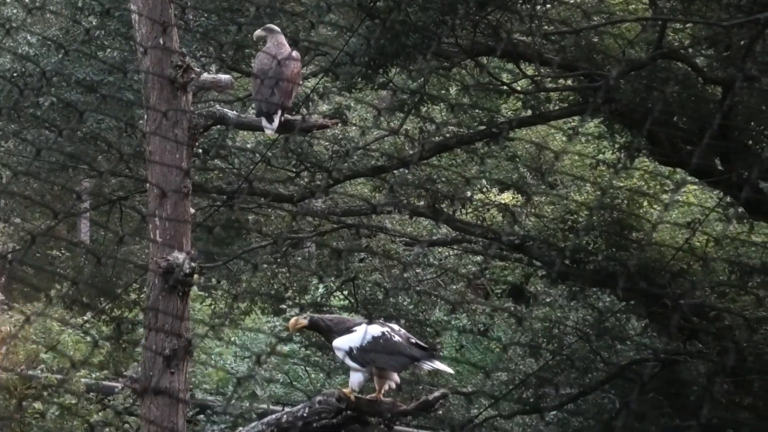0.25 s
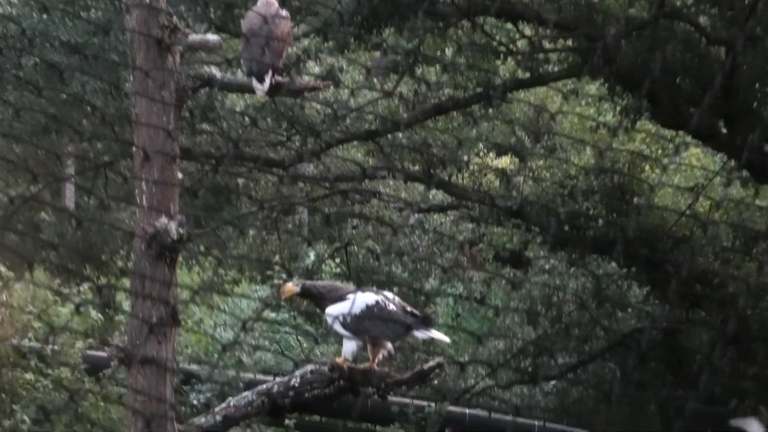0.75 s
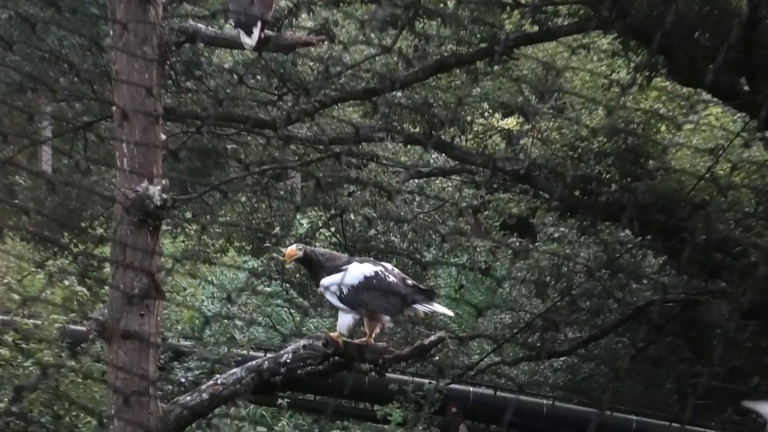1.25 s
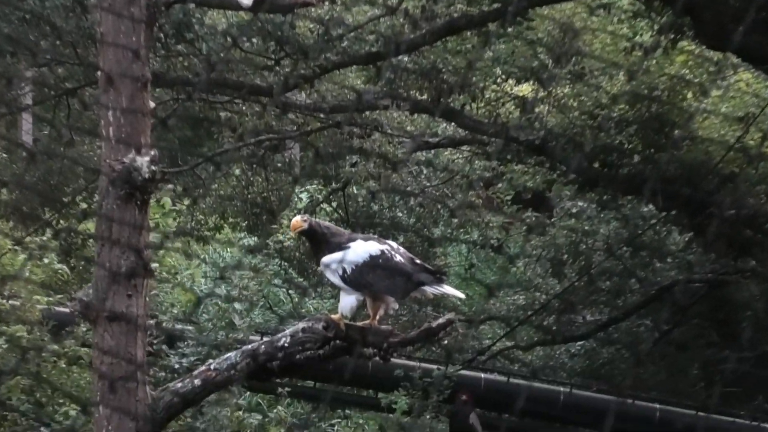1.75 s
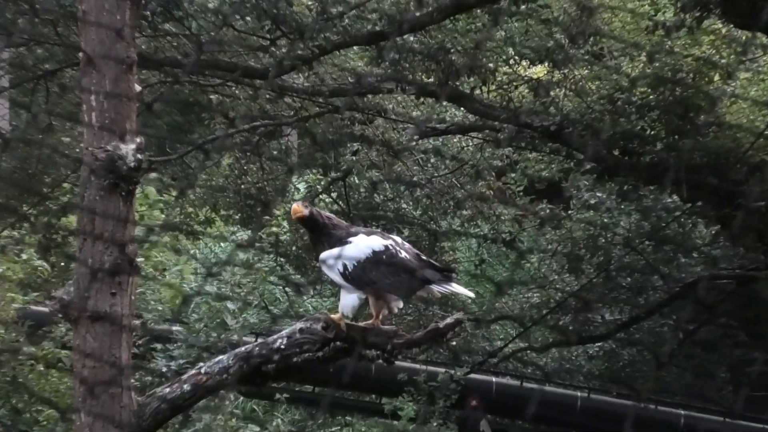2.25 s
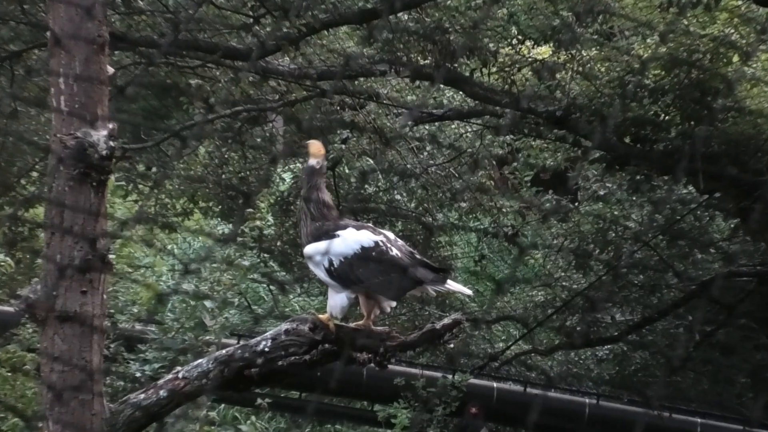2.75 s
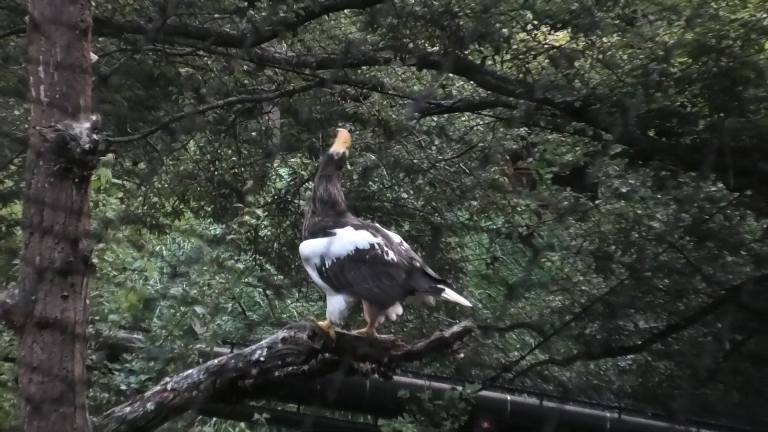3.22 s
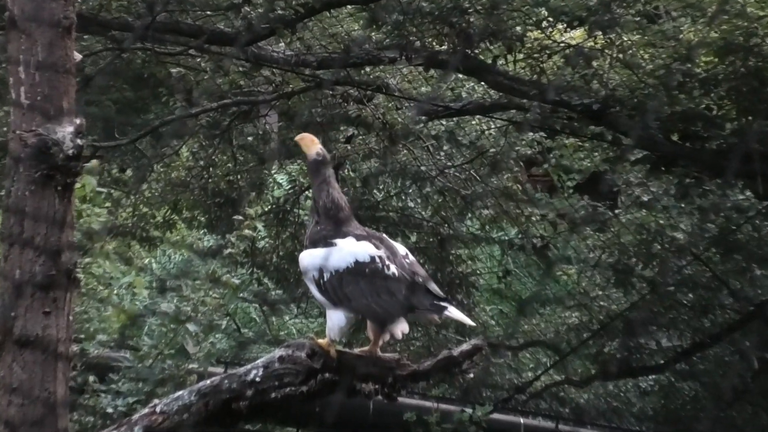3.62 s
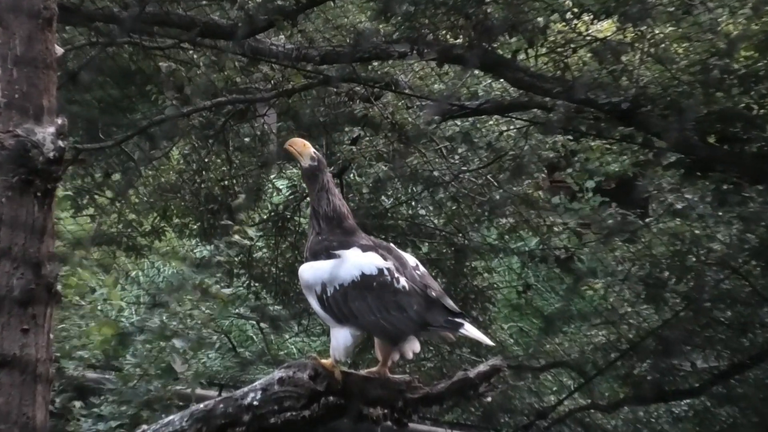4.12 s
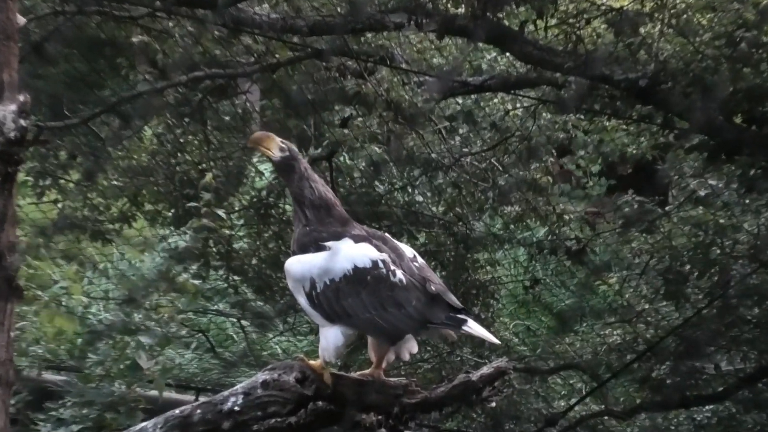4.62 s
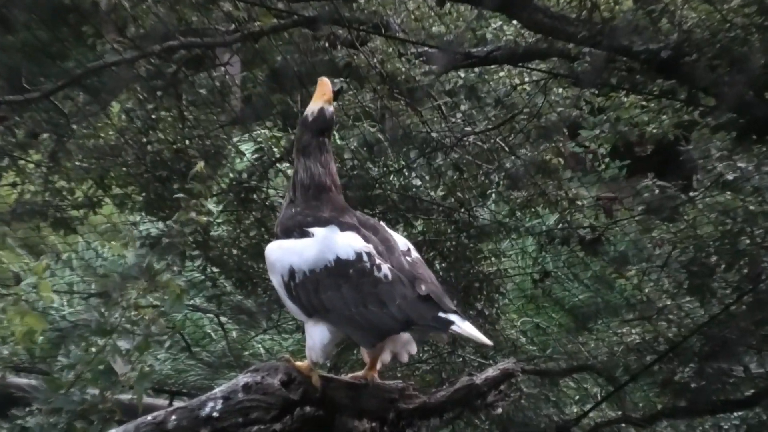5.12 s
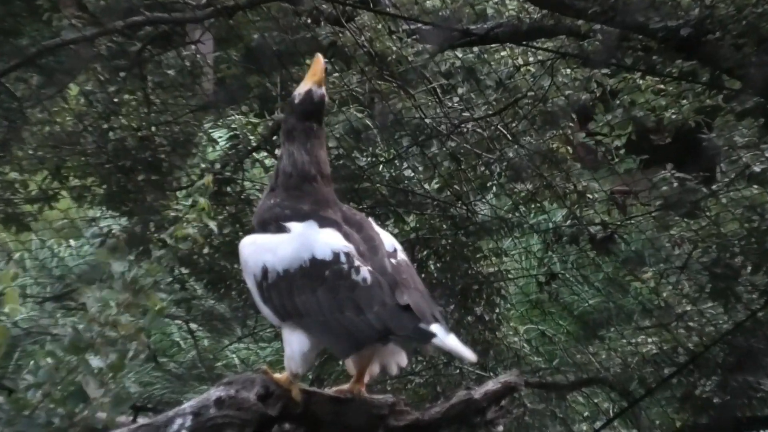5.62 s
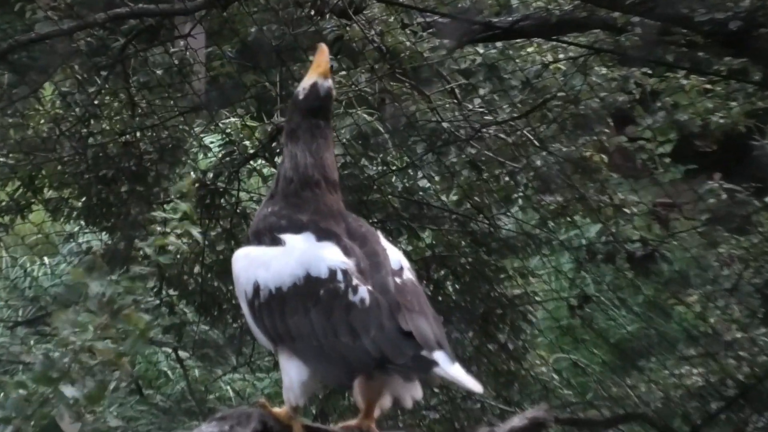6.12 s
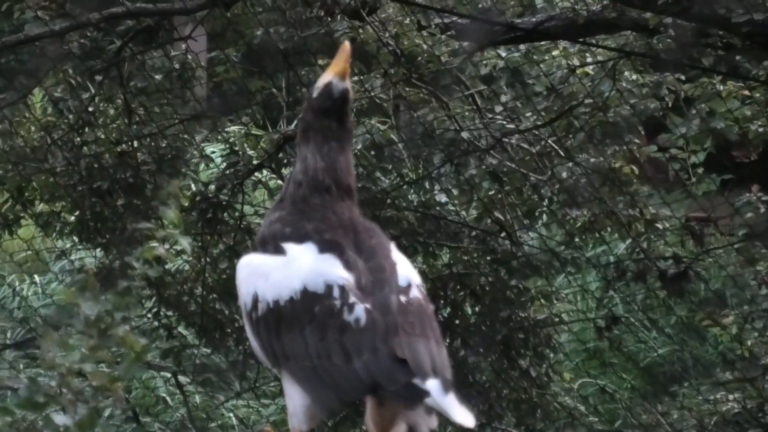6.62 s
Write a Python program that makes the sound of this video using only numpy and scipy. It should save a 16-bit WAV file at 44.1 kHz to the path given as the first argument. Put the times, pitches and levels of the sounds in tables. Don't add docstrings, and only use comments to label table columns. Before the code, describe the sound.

Outdoors among trees, handheld stereo microphone with wind buffeting, strongest around the middle. Cicadas rasp continuously over a hissing distant swarm, and a remote crow caws regularly. A big eagle on a branch first draws faint, thin whistles and mutters small notes, then gives a spaced run of clipped, slightly hoarse yelps, most preceded by a quick rising whistle, with short flickering echoes from trunks and leaves.

```python
import sys
import numpy as np
from scipy import signal
from scipy.fft import rfft, irfft, next_fast_len
from scipy.io import wavfile
from scipy.ndimage import uniform_filter1d, map_coordinates

SR = 44100
rng = np.random.default_rng(int(sys.argv[2]) if len(sys.argv) > 2 else 0)


def put_to_file(sound):
    columns = np.atleast_2d(sound).T
    safe = np.clip(columns, -1, 1)
    whole_steps = np.round(safe * 32767)
    wavfile.write(sys.argv[1], SR, whole_steps.astype(np.int16))


def invert_db(level):
    return 10 ** (np.asarray(level, dtype=float) / 20)


N = 302570
T = np.arange(N) / SR


def unit(x):
    return x / np.sqrt(np.mean(x ** 2) + 1e-20)


def along(points, hz):
    f, v = np.transpose(points)
    return np.interp(np.log(hz + 1), np.log(f + 1), v, left=v[0] - 40, right=v[-1] - 40)


def curves(rows):
    times, *columns = np.transpose(rows)
    return [np.interp(T, times, column) for column in columns]


def wobble(rate):
    return map_coordinates(rng.standard_normal(int(N * rate / SR) + 4), [T * rate])


def phase_of(pitch):
    return 2 * np.pi * np.cumsum(pitch) / SR


def patches(shape, bands, frames):
    field = uniform_filter1d(rng.standard_normal(shape), size=bands, axis=0)
    return unit(uniform_filter1d(field, size=frames, axis=1))


def rush(spectrum, alike, patchy_db):
    size = next_fast_len(N + 8192)
    z = signal.stft(rng.standard_normal((2, N + 512)), nperseg=512)[2]
    gain = invert_db(patchy_db * patches(z.shape[1:], 5, 12))
    pair = signal.istft(z * gain, nperseg=512)[1][:, :N]
    response = invert_db(along(spectrum, np.fft.rfftfreq(size, 1 / SR)))
    a, b = irfft(rfft(pair, size) * response, size)[:, :N]
    turn = np.arccos(np.clip(alike, -1, 1)) / 2
    middle, side = np.cos(turn) * a, np.sin(turn) * b
    return unit(np.array([middle + side, middle - side]))


# (start [s], length [s], top pitch [Hz], share of length at the top [1], level [dB])
YELP_CALLS = [
    (5.1, 0.0934, 955, 0.10146, -28),
    (5.398, 0.074, 970, 0.1888, -25),
    (5.777, 0.084, 1009, 0.2, -25),
    (6.324, .092, 1065, .27, -23),
    (6.751, 0.085, 1064, 0.22, -22.5),
]
# (frequency [Hz], gain [dB])
YELP_THROAT = [(700, -22), (820, -14), (900, -2), (1100, 0), (1500, -4), (1800, -17), (1950, -15),
               (2120, -15.5), (2750, -19), (2900, -16), (3150, -31), (3800, -27), (4250, -35), (5500, -28)]
# (frequency [Hz], density [dB per Hz])
YELP_BREATH = [(550, -18), (750, -2), (1000, 8), (1500, -8), (2100, -12), (3000, -16), (4500, -30)]


def yelps():
    out = np.zeros(N)
    breath = rush(YELP_BREATH, 0.78, patchy_db=4.0)[0]
    for start, length, hz, top, db in YELP_CALLS:
        u = np.clip((T - start) / length, 0, 1)
        arch = .12 + 17 * top ** 3
        pitch = hz * (1 - arch * (u - top) ** 2 - 0.075 * u ** 7)
        phase = phase_of(pitch * (1 + 0.00296 * wobble(150)))
        effort_db = .13 * (hz - 1035) + 5 * (u - .6)
        octave_db = 0.038 * (hz - 977)
        tone = invert_db(-31.5) * np.sin(1.5 * phase)
        for k in range(1, 6):
            partial_db = along(YELP_THROAT, k * pitch) + effort_db * (k > 2) + octave_db * (k == 2)
            tone += invert_db(partial_db) * np.sin(k * phase)
        attack = np.clip(u * length / 0.0052, 0, 1)
        release = np.clip((1 - u) * length / 0.022, 0, 1)
        level_db = db - 5.5 * u ** 0.88 + 0.76 * wobble(90)
        out += invert_db(level_db) * attack * release * (np.sqrt(2) * tone + invert_db(-14.5) * breath)
    return out


def gliding_call(row, rough, bend, swell_db, fade_db, throat=None):
    start, length, first_hz, last_hz, db = row
    u = np.clip((T - start) / length, 0, 1)
    pitch = last_hz + (first_hz - last_hz) * (1 - u) ** bend
    phase = phase_of(pitch * (1 + 0.00777 * rough * wobble(150)))
    top = 0.81 if last_hz > 1.05 * first_hz else 0.37
    swell = swell_db * (1 - u / top) ** 2
    fall = fade_db * (u - top) / (1 - top)
    level_db = db - np.where(u < top, swell, fall)
    tone = np.sin(phase)
    if throat:
        tone = sum(invert_db(along(throat, k * pitch)) * np.sin(k * phase) for k in range(1, 5))
    tone = tone + invert_db(-15 + 5.8 * rough) * wobble(900) * np.sin(phase)
    edges = np.clip(np.minimum(u, 1 - u) * length / 0.011, 0, 1)
    return np.sqrt(2) * tone * edges * invert_db(level_db + 2.4 * rough * wobble(110))


# (start [s], length [s], first pitch [Hz], last pitch [Hz], level [dB])
FAINT_NOTES = [
    (3.107, 0.075, 960, 604, -39),
    (3.338, 0.076, 863, 856, -40.5),
    (3.376, .055, 860, 602, -39),
    (3.44, 0.12, 880, 845.3, -46),
]
# (frequency [Hz], gain [dB])
HALF_SHUT_BEAK = [(550, -6), (870, -0.5), (1300, -1.5), (1720, -12.5), (1950, -11), (2600, -24),
                  (3600, -34)]


def faint_notes():
    return sum(gliding_call(row, rough=1.23, bend=2.7, swell_db=2, fade_db=11, throat=HALF_SHUT_BEAK)
               for row in FAINT_NOTES)


# (start [s], length [s], first pitch [Hz], last pitch [Hz], level [dB])
IN_BREATHS = [
    (2.76, .1, 2886, 3086, -48),
    (2.85, .11, 3060, 2920, -46),
    (2.968, .055, 2910, 2800, -51),
    (3.015, 0.16, 3085, 3110, -38.5),
    (3.289, .05, 3250, 3510, -47),
    (4.965, .125, 2010, 3900, -38.5),
    (5.079, .06, 3880, 3980, -41.5),
    (5.73, .052, 3538, 4033, -44),
    (6.271, .06, 3338, 4240, -42),
    (6.703, 0.046, 3600, 4220, -37),
]


def whistles():
    return sum(gliding_call(row, rough=0.92, bend=1.7, swell_db=16, fade_db=24) for row in IN_BREATHS)


# (time [s], centre of drum resonance [Hz], level [dB])
CICADA_DRUMS = [(0.0, 7400, -30.5), (0.45, 8640, -27), (1.3, 8600, -26.5), (2.0, 8480, -26),
                (2.6, 8640, -27), (2.96, 8580, -24.5), (3.3, 8500, -26.5), (4.1, 8320, -25.8),
                (4.9, 8280, -27.5), (5.6, 8350, -25), (5.9, 8284, -28.5), (6.1, 8230, -24),
                (6.5, 8300, -28), (6.86, 8130, -26)]
# (time [s], drum tone [Hz], click rate [1/s], level against the rest [dB])
CLEAR_SINGER = [(0, 7940, 610, -11), (.5, 8890, 430, -2), (1.2, 8670, 376, -10), (2.9, 8460, 364, -4),
                (4.3, 8520, 400, -8.5), (5.6, 8310, 324, -6.5), (6.86, 8350, 420, -9)]


def cicada():
    centre, db = curves(CICADA_DRUMS)
    tone_hz, rate, singer_db = curves(CLEAR_SINGER)
    clicks = phase_of(rate * (1 + 0.0056 * wobble(20)))
    drum = phase_of(tone_hz * (1 + 0.0014896 * wobble(45)))
    singer = unit(np.exp(4.2 * np.cos(clicks)) * np.sin(drum) * invert_db(2.6 * wobble(50)))
    rasp = (1 + 0.11 * np.cos(clicks)) * rng.standard_normal(N)
    hz, t, z = signal.stft(np.pad(rasp, (0, 512)), SR, nperseg=512)
    off = hz[:, None] - np.interp(t, T, centre)
    width = np.where(off > 0, 650, 800)
    ring = np.exp(-.5 * (off / width) ** 2) * invert_db(2.6 * patches(z.shape, 3, 30))
    many = unit(signal.istft(z * ring, nperseg=512)[1][:N])
    return invert_db(db - 1.0 + 0.3 * wobble(9)) * (many + invert_db(singer_db) * singer)


# (time [s], pitch [Hz], level [dB])
TRILLERS = [
    [(0, 2207, -57), (1.2, 2195, -52.5), (2.2, 2195, -55.5), (3.6, 2180, -63.5), (6.86, 2174, -57.5)],
    [(0, 2113, -63), (1.4, 2096, -54), (3, 2063, -56), (4, 2040, -63), (6.86, 2052, -66.5)],
]


def trills():
    out = np.zeros((2, N))
    for rows, rate, start, side_db in zip(TRILLERS, (8.1, 8.5), (.58, .1), (1, -5)):
        pitch, db = curves(rows)
        cycle = 2 * np.pi * (rate * T + start + .1 * wobble(1.5))
        burst = np.clip(np.sin(cycle) + .5, .45, 1)
        phase = phase_of(pitch * (1 + 0.00916 * wobble(90)))
        for channel, lag in enumerate((0, 1.6)):
            octave = invert_db(db + 8) * np.sin(2 * phase - 1.23 * channel)
            voice = invert_db(db) * np.sin(phase - lag) + octave
            grain_db = 2.5 + side_db * (1 - 2 * channel) + 4.9 * wobble(70)
            out[channel] += invert_db(grain_db) * burst * voice
    return out


# (middle [s], top pitch [Hz], level [dB], length [s])
CROW_CAWS = [
    (.272, 470, -55, .2),
    (.88, 478, -55, .21),
    (1.44, 474, -55, .21),
    (2.03, 466, -56, .21),
    (2.645, 478, -55, .22),
    (3.18, 470, -56, .2),
    (3.89, 468, -57, .2),
    (4.64, 468, -57, .2),
    (5.33, 460, -58, .2),
    (6.07, 468, -57, .2),
]
# (frequency [Hz], gain [dB])
CROW_THROAT = [(300, -30), (470, -8), (930, 5), (1150, 17), (1400, 19), (1900, 1), (2400, -30)]


def crow():
    out = np.zeros(N)
    for middle, hz, db, length in CROW_CAWS:
        u = np.clip((T - middle) / (length * np.where(T < middle, .4, .6)), -1, 1)
        pitch = hz * (1 - .27 * np.abs(u) ** 1.3)
        phase = phase_of(pitch * (1 + 0.0057 * wobble(70)))
        swell = (1 - u ** 2) ** .6 * invert_db(-5 - 4 * np.abs(u) + 3.5 * wobble(45))
        voice = sum(invert_db(along(CROW_THROAT, k * pitch)) * np.sin(k * phase) for k in range(1, 6))
        out += invert_db(db) * swell * voice
    return out


# (frequency [Hz], t60 [s])
WOODS_T60 = [(300, .8), (1000, .95), (2000, .6), (3200, .7), (4000, .65), (10000, .3)]


def woods(x):
    hz, t, z = signal.stft(rng.standard_normal((2, SR)), SR, nperseg=256)
    lumpy_db = 2.2 * rng.standard_normal(len(t) // 6 + 1).repeat(6)[:len(t)]
    t60 = np.interp(hz, *np.transpose(WOODS_T60))[:, None]
    tail = signal.istft(z * invert_db(-60 * t / t60 + lumpy_db), SR, nperseg=256)[1]
    tail = tail + 0.15 * tail[::-1]
    late = np.pad(x, (700, 0))[None]
    return signal.fftconvolve(late, tail / np.linalg.norm(tail[0]), axes=1)[:, :N]


# (time [s], strength [dB], tilt from slow thumps to fast flutter [dB])
BREEZE = [(0, -48.5, -1.5), (1, -47.5, -0.5), (2, -45.5, -4), (3.15, -54.5, -1), (3.55, -48, -2),
          (4.1, -41.5, 4), (4.55, -51.5, 5.5), (5.2, -53, 6), (5.7, -46, -2.5), (6.0, -49, 11.5),
          (6.45, -53.5, 5.5), (6.86, -58, 4)]
# (middle [s], half length [s], strength [dB], tilt [dB], left minus right [dB])
GUST_EVENTS = [(0.05, 0.16, -42, -1.5, -2), (0.884, 0.28, -40.5, -4, -3), (1.228, .05, -42.5, -7, -1),
               (1.37, 0.043, -41.5, -2.5, -4.5), (1.745, 0.068, -46, -4, -2), (2.104, .06, -44, -4, 2),
               (2.283, 0.061, -41, -1, 2), (2.849, 0.045, -50.5, -4, 6), (3.055, 0.019, -54, -4, 1.8),
               (3.433, 0.072, -45.5, -5.5, -1.1), (3.622, 0.063, -44, -6.5, -4),
               (3.81, 0.078, -36, -2, 0.5), (3.877, 0.04234, -37, -5.5, 5), (4.028, .03, -40, -6, -3),
               (4.22, 0.0492, -35.5, -2, -1), (4.336, 0.089, -42.5, 6, 3.5), (4.757, 0.065, -39, 5.5, 5),
               (5.52, 0.026, -41.5, 3.7, -1.1), (5.651, 0.043, -43.5, 4, 2), (5.862, 0.057, -37, 5.5, 2),
               (6.082, 0.032, -48.5, 10.5, 1.5), (6.251, 0.022, -44, 9, -1), (6.775, .04, -45.5, 2, 2)]


def airflow():
    breeze_db, breeze_tilt = curves(BREEZE)
    middle, half, db, tilt, pan = np.transpose(GUST_EVENTS)
    bumps = invert_db(2 * db)[:, None] * np.exp(-((T - middle[:, None]) / half[:, None]) ** 2)
    breeze = invert_db(2 * breeze_db)
    power = breeze + bumps.sum(0)
    return 10 * np.log10(power), (breeze * breeze_tilt + tilt @ bumps) / power, pan @ bumps / power


def lumps():
    return np.array([0.42 * wobble(14) + 2.24 * wobble(40) for _ in range(2)])


# (frequency [Hz], density [dB per Hz])
THUMP_BAND = [(12, -28), (30, -10), (45, -6.5), (70, -4.5), (100, -3.5), (160, -25)]
# (frequency [Hz], density [dB per Hz])
BUFFET_BAND = [(55, -18), (105, -0.5), (160, 0), (210, 0), (340, -9), (600, -37.5)]
# (frequency [Hz], density [dB per Hz])
FLUTTER_BAND = [(130, -18), (260, 0.5), (450, -2.5), (750, -13), (1200, -25), (2000, -36)]
# (frequency [Hz], density [dB per Hz])
GUST_HISS = [(400, -19), (650, 8), (1000, -13), (1400, -27), (2000, -30)]


def wind():
    strength_db, tilt_db, pan_db = airflow()
    thump_db, flutter_db = strength_db - tilt_db, strength_db + tilt_db
    buffet_db = -39.5 + 0.85 * wobble(11) + 0.71 * (strength_db + 46) + 0.15 * np.abs(tilt_db)
    shared = lumps()
    thump = invert_db(thump_db + 0.5) * rush(THUMP_BAND, 0.11 + 0.13 * wobble(6.16), patchy_db=-0.5)
    buffet = invert_db(shared) * rush(BUFFET_BAND, 0.07 + 0.22 * wobble(3.8), patchy_db=1.5)
    buffet = invert_db(buffet_db + 1.5) * unit(buffet)
    flutter = invert_db(1.12 * shared + 0.55 * lumps()) * rush(FLUTTER_BAND, -0.11, patchy_db=0.5)
    flutter = invert_db(flutter_db + 2.5) * unit(flutter)
    hiss_db = 2.6 * (flutter_db + 31) - 40.0 + 1.0 * lumps()
    hiss = invert_db(hiss_db) * rush(GUST_HISS, .05, patchy_db=10.5)
    return (thump + buffet + flutter + hiss) * invert_db(np.outer([.5, -.5], pan_db))


# (time [s], level [dB])
CHORUS_LEVEL = [(0.0, -31), (1.3, -29.5), (2.4, -30.5), (3.6, -31), (4.6, -31.5), (4.76, -34), (5.16, -31),
                (5.79, -31), (5.9, -34), (6.11, -33), (6.46, -34.5), (6.74, -30.5), (6.86, -37.5)]
# (frequency [Hz], density [dB per Hz])
SWARM_BAND = [(3300, -32), (3740, -34.5), (4200, -14), (4700, -7.5), (5950, -2), (7000, 1), (7800, -2),
              (8600, -5), (9600, -11), (11000, -51)]
# (time [s], level [dB])
LOW_GROUP_LEVEL = [(0.0, -23.5), (1.13, -26), (2.12, -23.5), (3.32, -26.5), (4.2, -31), (6.86, -31)]
# (frequency [Hz], density [dB per Hz])
LOW_GROUP_BAND = [(5300, -12.5), (5750, -5.5), (6050, -3.5), (6500, -15), (7000, -20)]
# (frequency [Hz], density [dB per Hz])
LEAF_BAND = [(7000, -23), (9500, 3.5), (11000, -1), (13000, -1), (15200, -2), (16000, -37)]
# (frequency [Hz], density [dB per Hz])
AIR_BAND = [(500, 5), (800, 1.5), (1100, 1.5), (1600, 0), (2100, 3), (2600, 2), (3500, 0.5), (4200, 11.5),
            (6000, -16)]


def background():
    level_db, = curves(CHORUS_LEVEL)
    low_db, = curves(LOW_GROUP_LEVEL)
    swarm = invert_db(level_db + 1.36 + 0.08 * wobble(4.3)) * rush(SWARM_BAND, 0.96, patchy_db=1.05)
    low = invert_db(low_db - 10.0 + .8 * wobble(2.5)) * rush(LOW_GROUP_BAND, 0.83, patchy_db=0.5)
    leaves = invert_db(level_db - 5 + 0.3 * wobble(6.6)) * rush(LEAF_BAND, 0.47, patchy_db=1.6)
    leaves *= invert_db([[-1.3], [1.3]])
    air_db = -47.5 + 0.63 * (level_db - level_db.mean())
    return swarm + low + leaves + invert_db(air_db) * rush(AIR_BAND, 0.34, patchy_db=1.0)


# (frequency [Hz], density [dB per Hz])
TRAFFIC_BAND = [(120, -20), (170, -11), (205, 4), (250, -14), (400, -17)]


def traffic_hum():
    return invert_db(-53 + 2.6 * wobble(2.9)) * rush(TRAFFIC_BAND, .5, patchy_db=4.0)


def scene():
    notes, breaths = yelps() + faint_notes(), whistles()
    far, near = crow(), cicada()
    animals = notes * invert_db([[1.2], [-1.2]]) + breaths + near * invert_db([[.4], [-.4]])
    animals += [far, invert_db(-7) * np.roll(far, 15)]
    echoes = woods(invert_db(-11.5) * notes + invert_db(-2.5) * breaths + invert_db(-12) * far + invert_db(-18) * near)
    echoes *= invert_db(3.8 * np.array([wobble(60), wobble(60)]))
    return animals + echoes + trills() + background() + wind() + traffic_hum()


def roll_off(x):
    return signal.sosfilt(signal.butter(12, 15680, fs=SR, output="sos"), x)


def record(dry):
    return roll_off(dry)


dry = scene()
out = record(dry)
put_to_file(out)
```